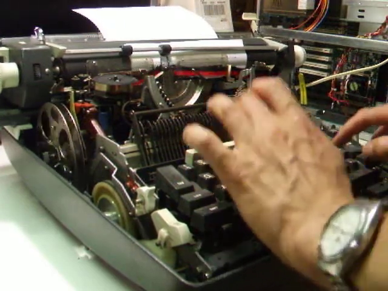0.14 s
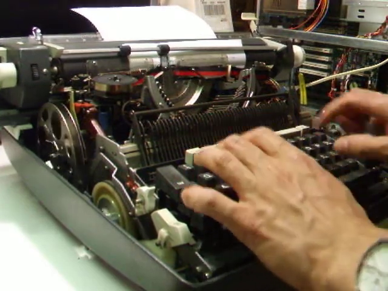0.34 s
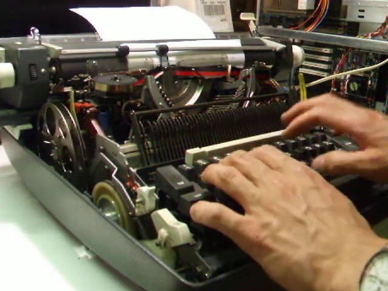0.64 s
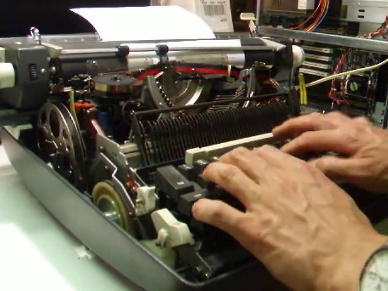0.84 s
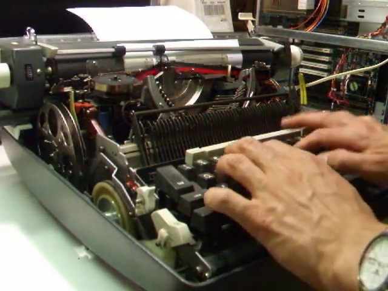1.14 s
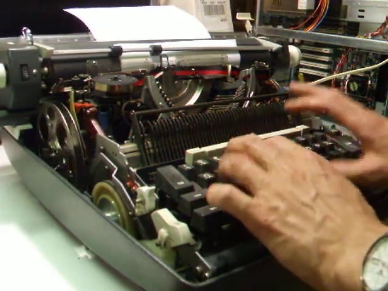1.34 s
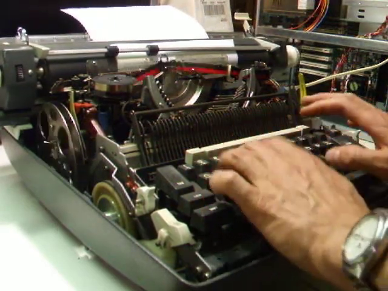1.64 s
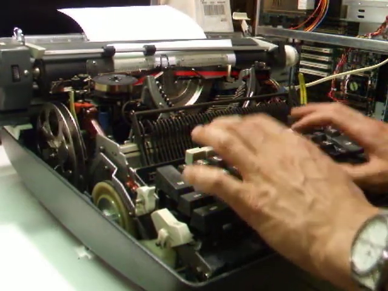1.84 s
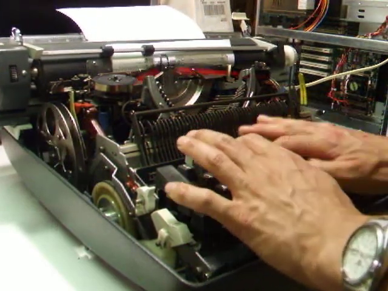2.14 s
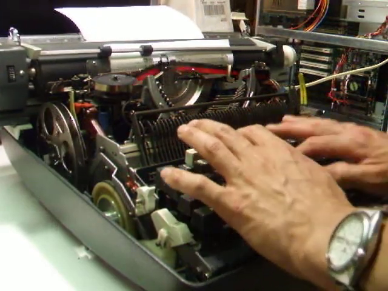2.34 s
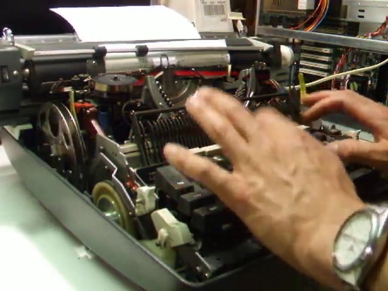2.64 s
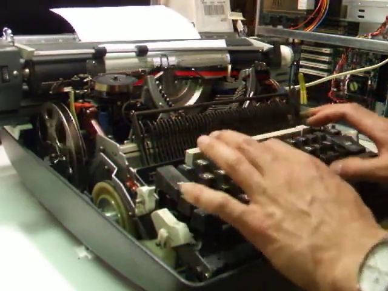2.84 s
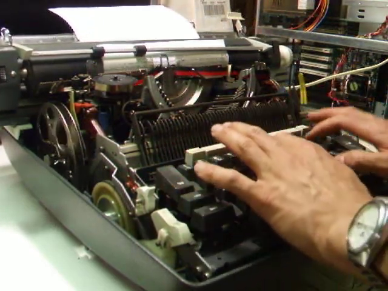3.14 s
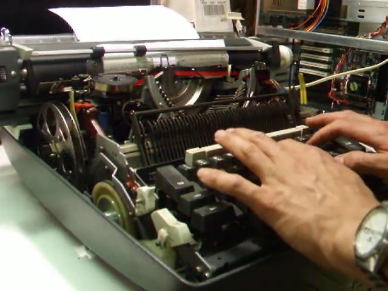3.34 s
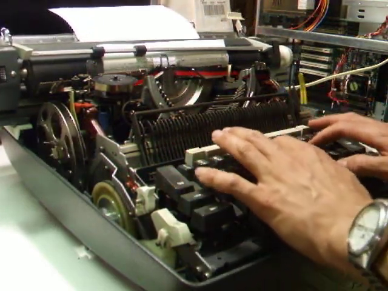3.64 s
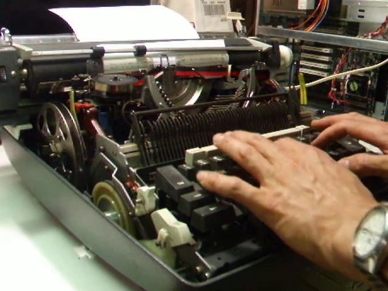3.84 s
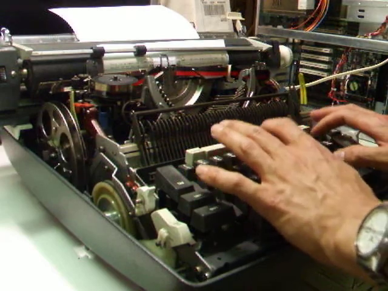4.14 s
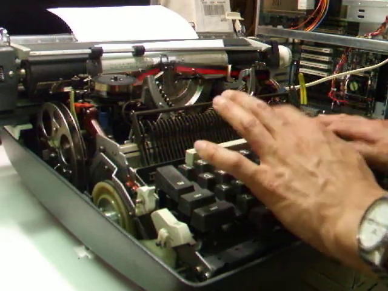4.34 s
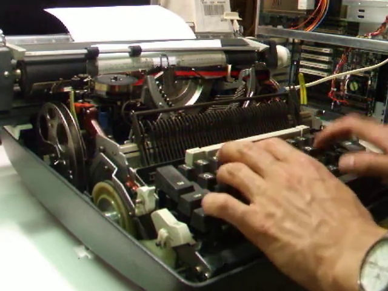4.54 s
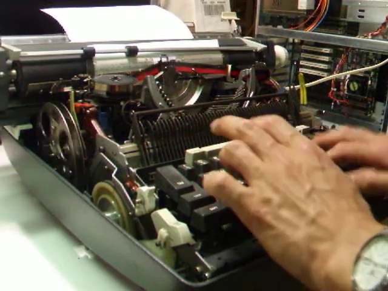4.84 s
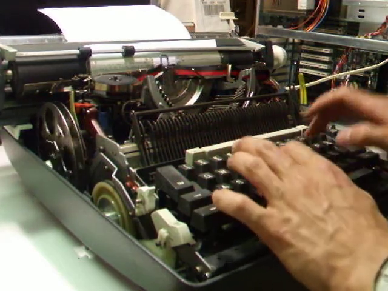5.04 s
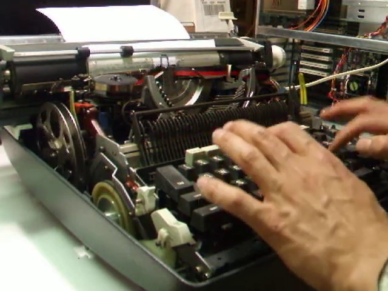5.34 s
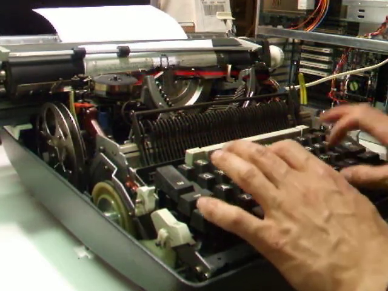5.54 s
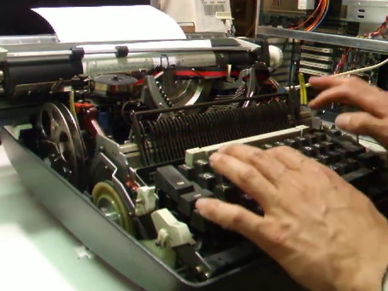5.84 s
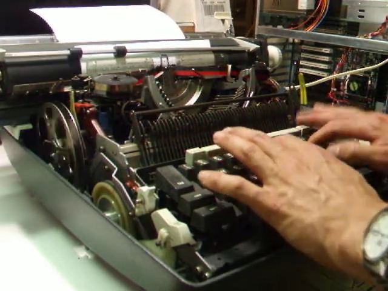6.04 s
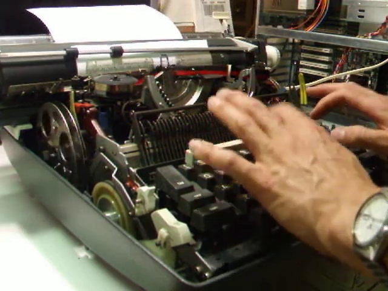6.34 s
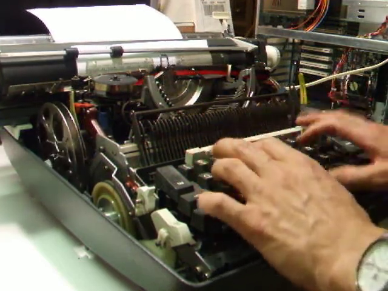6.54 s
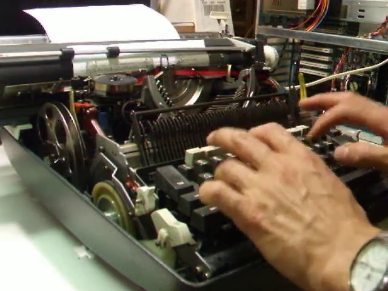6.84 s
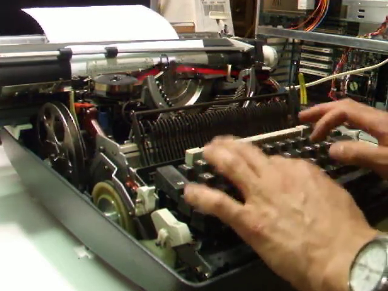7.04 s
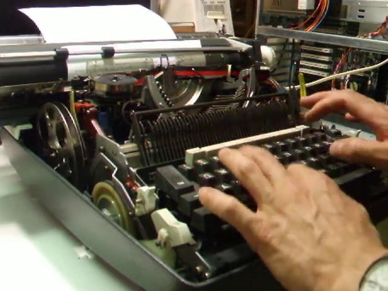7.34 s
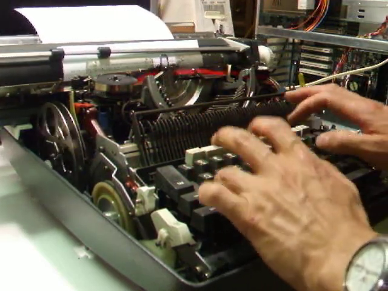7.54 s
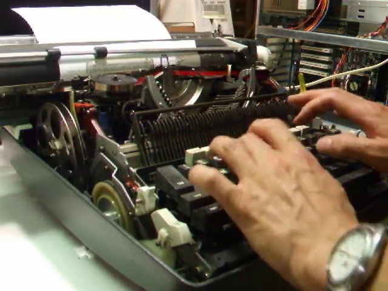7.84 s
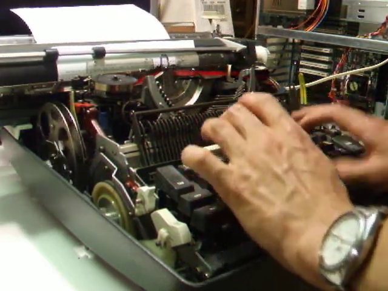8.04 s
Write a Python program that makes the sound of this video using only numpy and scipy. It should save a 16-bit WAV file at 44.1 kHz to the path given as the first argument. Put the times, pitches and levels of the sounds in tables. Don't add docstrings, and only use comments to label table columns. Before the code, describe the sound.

An open electric typewriter, heard very close in a workshop. Fast, irregular keystrokes: each a bright click, a tiny whirr, then a hard, dry slap on the roller and a loose metal rattle. After nearly three seconds the typing pauses for over a second, leaving a low motor hum with a thin whine, then resumes until the end. Short room echo, dull top, the hardest hits slightly distorted.

```python
import sys
import numpy as np
from scipy import signal
from scipy.fft import rfft, irfft, next_fast_len
from scipy.io import wavfile
from scipy.ndimage import uniform_filter1d

SR = 44100
rng = np.random.default_rng(int(sys.argv[2]) if len(sys.argv) > 2 else 0)


def boost_factor(decibels):
    exponent = np.asarray(decibels, float) / 20
    return 10 ** exponent


def put_to_file(sound):
    columns = np.atleast_2d(sound).T
    safe = np.clip(columns, -1, 1)
    whole_steps = np.round(safe * 32767)
    wavfile.write(sys.argv[1], SR, whole_steps.astype(np.int16))


N = 361179

# [start_s, ping_db, ping_hz,
# click_db]
LATCH_TRIPS = [(0.0222, -12.1, 6570, -17.0), (0.2203, -15.7, 6370, -25.7), (0.4268, -27.7, 5820, -33.5),
               (0.8348, -11.1, 5760, -15.6), (0.9852, -10.5, 6500, -18.4), (1.1336, -11.4, 5760, -14.7),
               (1.267, -19.9, 6430, -27.7), (1.4025, -12.2, 6670, -20.4), (1.5796, -20.8, 6360, -26.5),
               (1.7487, -24.4, 5140, -25.5), (1.7804, -25.3, 5370, -33.9), (1.9422, -8.7, 6100, -11.9),
               (2.1451, -13.8, 6200, -17.5), (2.3314, -14.7, 7280, -25.9), (2.4188, -16.2, 6090, -21.8),
               (2.5324, -18.1, 6410, -26.7), (2.8938, -24.0, 6050, -33.5),
               (4.2394, -9.9, 6290, -16.0), (4.318, -16, 5950, -19), (4.3495, -18, 7000, -30),
               (4.5765, -10.0, 6390, -19.8), (4.7175, -15.7, 5920, -22.1), (4.8295, -10.9, 6290, -22.8),
               (4.9792, -13.1, 6420, -15.7), (5.1681, -7.8, 5840, -18.9), (5.4161, -21.2, 6470, -31.2),
               (5.6699, -14.6, 6930, -22.4), (5.9331, -12.1, 6170, -20.1), (6.0637, -11.5, 6520, -20.9),
               (6.2264, -9.5, 6220, -16.7), (6.5598, -21.3, 6210, -29.7), (6.7692, -16.3, 6060, -21.6),
               (6.9213, -11.5, 6320, -18.8), (7.0188, -13.5, 6340, -17.8), (7.174, -24.9, 5520, -28.4),
               (7.3724, -10.3, 5960, -22.8), (7.4852, -18.1, 7090, -20.7), (7.635, -14.9, 6170, -15.9),
               (7.7529, -17.2, 7360, -20.9), (7.905, -16.5, 5790, -23.6), (8.0832, -26.8, 6020, -33.0)]
# [start_s, peak_db, swing_db, rattle_s]
TYPE_STRIKES = [(0.0592, -3.8, -9, .053), (0.2598, -6.2, -10.5, .042), (0.8788, -4.7, -10.5, .045),
                (1.0215, -1.1, -12, .046), (1.1785, -5, -10.5, .053), (1.4429, -4.9, -10, .047),
                (1.6183, -4.7, -11, .027), (1.6678, -4.7, -9.5, .043), (1.9885, -5.9, -10.5, .042),
                (2.1908, -4.7, -8.5, .043), (2.3724, -1.2, -9, .037), (2.4555, -4.7, -9.5, .042),
                (2.5714, -5.2, -12, .042),
                (4.2797, -4.7, -9.5, .038), (4.3859, -4.9, -6, .05), (4.6162, -7.9, -9, .06),
                 (4.7537, -5.5, -8, .065), (4.8728, -9.0, -10, .05), (5.0241, -5.9, -6.5, .047),
                 (5.2122, -4.8, -7.5, .043), (5.4557, -7.0, -7, .076), (5.709, -6.3, -11, .054),
                 (5.974, -4.6, -7.5, .049), (6.1039, -2.5, -8.5, .046), (6.2646, -0.9, -11.5, .049),
                 (6.8067, -0.9, -12, .055), (6.9637, -5, -10, .05), (7.0575, 0.3, -9, .068),
                 (7.4099, -4.1, -8, .041), (7.5239, -0.6, -9, .044), (7.6793, -4.4, -8, .047),
                 (7.7913, -1.6, -11.5, .04), (7.9417, -5.2, -7, .044)]
# [start_s, level_db (rms), length_s]
SPACES = [
    (0.428, -28.5, 0.11),
    (1.271, -28.5, .09),
    (1.798, -30.5, 0.096),
    (2.915, -29, .095),
    (4.435, -28.5, 0.09),
    (5.525, -32.5, 0.067),
    (6.573, -28, 0.11),
    (7.169, -33, 0.1005),
    (8.098, -31.5, .1),
]
# [share of its length, level_db over the space]
SPACE_CAMS = [
    (.04, 15.5),
    (.33, 15),
    (.62, 14.5),
    (.9, 12.5),
]
# [start_s, peak_db, length_s]
SETTLES = [
    (0.168, -26, .012),
    (1.745, -24, 0.0079),
    (2.68, -45, .01),
    (3.035, -25.5, 0.014),
    (3.526, -38, .018),
    (5.62, -23, 0.018),
    (6.705, -29, .016),
    (7.15, -25, 0.022),
    (7.211, -27, 0.008),
    (7.276, -35, 0.017),
]
# [frequency_hz, density_db (per Hz)]
METALWORK = [(200, -10), (340, -19), (800, -7), (1400, -5), (2100, 0.5), (2700, -8.5), (3400, -3),
             (5000, 1.5), (6600, -1), (7600, 2), (9000, 6.5)]
# [frequency_hz, level_db, t60_s]
SLUG_MODES = [(1410, -18, 0.01), (2607, -17.5, 0.0034), (4296, -8.5, 0.011), (5463, -3.5, 0.006),
              (6336, 3, 0.0044), (6880, 6, 0.0046), (7535, 7, 0.0036)]
# [frequency_hz, width_hz, level_db]
CASE_MODES = [(207, 24, 0.5), (303, 55, -0.5), (370, 40, 1), (560, 120, -5.5)]
# [frequency_hz, width_hz, level_db]
DESK_MODES = [(46.8, 14, -10), (116, 54, -4.5)]
# [delay_s from the strike, thud_db, case_db (rms), length_s]
JOLTS = [
    (-.022, -38.5, -41.5, 0.0094),
    (.045, -37.5, -43.5, 0.016),
]
DESK_LAGS = [0.00735, 0.01617]
# [frequency_hz, level_db (rms)]
HUM = [(60, -59), (120, -66), (178.6, -74), (206.6, -62), (240, -66.5), (357.2, -56), (387, -66),
       (413.1, -64), (610.5, -74), (714.2, -71), (774, -73), (833.5, -74)]
# [frequency_hz, level_db (rms)]
WHINE = [(7822, -80), (7854, -73), (7881, -74.5), (7913, -88), (8118, -68), (8150, -83.5), (8177, -92)]
# [frequency_hz, width_hz, level_db (rms)]
BEARINGS = [(980, 90, -68), (3490, 80, -71.5), (4710, 35, -67.5), (5200, 120, -71), (5670, 140, -71)]
# [frequency_hz, density_db (per Hz)]
AIR_SPECTRUM = [(45, -22), (85, -17.5), (180, -17), (330, -16), (560, -20.5), (900, -16), (3000, -21.5),
                (4800, -19.5), (9000, -24)]
# [time_s, motor_db]
MOTOR_GAIN = [(0, -1), (.7, -1), (2.75, -3), (3.2, -1), (3.7, 0), (4.2, 1), (4.4, -1), (8.19, -1)]
# [start_s, peak_db, pitch_hz]
LONE_TICK = (3.9656, -30, 5200)
# [frequency_hz, gain_db]
TOP_CUT = [(7300, 0), (8000, -5), (8500, -16), (8940, -29), (9040, -85)]

TRIPS = LATCH_TRIPS
STRIKES = np.transpose(TYPE_STRIKES)


def rms_one(x):
    return x / np.sqrt(np.mean(x ** 2) + 1e-20)


def at_hz(points, hz):
    table_hz, table_db = np.array(points).T[:2]
    return np.interp(np.log(hz), np.log(table_hz), table_db)


def drift(rate):
    r = np.exp(-40 * np.pi * rate / SR)
    slow = signal.lfilter([1], [1, -2 * r, r * r], rng.standard_normal(N // 20 + 2002))[2000:]
    return np.interp(np.arange(N) / 20, np.arange(len(slow)), rms_one(slow))


def resonate(x, hz, width_hz):
    r = np.exp(-np.pi * width_hz / SR)
    zeros = np.array([1, 0, -1]) * (1 - r * r) / 2
    poles = [1, -2 * r * np.cos(2 * np.pi * hz / SR), r * r]
    return signal.lfilter(zeros, poles, x + 1e-18)


def shaped(x, spectrum):
    size = next_fast_len(N)
    hz = np.arange(1, size // 2 + 2) * SR / size
    return irfft(rfft(x, size) * boost_factor(at_hz(spectrum, hz)), size)[..., :N]


def add(out, s, sound):
    i = round(s * SR)
    out[i:i + len(sound)] += sound[:max(N - i, 0)]


def blow(modes_hz, modes_db, t60, contact_s):
    t = np.arange(2600)[:, None] / SR
    decay = boost_factor(modes_db - 60 * t / t60)
    rings = decay * np.sin(2 * np.pi * modes_hz * t) * (1 - np.exp(-t / contact_s))
    sound = rings.sum(axis=1)
    return sound / np.abs(sound).max()


def motion(s, db, lasts_s, rise_s, fall_db_per_s):
    out = np.zeros(N)
    t = np.arange(9000) / SR
    for start, level, length in zip(s, db, lasts_s):
        shape = boost_factor(level - fall_db_per_s * np.maximum(t - length, 0)) * (1 - np.exp(-t / rise_s))
        add(out, start, shape ** 2)
    return out


def boom(modes, db):
    push, sound = rng.standard_normal(N), np.zeros(N)
    for k, (hz, width_hz, level_db) in enumerate(modes):
        sound += (-1) ** k * boost_factor(level_db) * resonate(push, hz, width_hz)
    return boost_factor(db) * sound / np.sqrt(uniform_filter1d(sound ** 2, size=2200))


def motor():
    t = np.arange(N) / SR
    shaft_hz = 29.77
    wander_s = np.cumsum(1 + .0006 * drift(2)) / SR
    sound = np.zeros(N)
    for hz, db in HUM:
        level = np.sqrt(2) * boost_factor(db + .8 * drift(4))
        sound += level * np.sin(2 * np.pi * (hz * wander_s + rng.random()))
    for hz, db in WHINE:
        sound += np.sqrt(2) * boost_factor(db + 4.5) * np.sin(2 * np.pi * (hz * t + rng.random()))
    throb = boost_factor(6.9 * np.sin(2 * np.pi * shaft_hz * wander_s) + 2.0 * drift(27))
    grit = rng.standard_normal(N) * throb
    for hz, width_hz, db in BEARINGS:
        sound += boost_factor(db) * rms_one(resonate(grit, hz, width_hz))
    sound += boost_factor(-48) * rms_one(shaped(rng.standard_normal(N) * throb ** 0.24, AIR_SPECTRUM))
    gain_s, gain_db = np.transpose(MOTOR_GAIN)
    return sound * boost_factor(np.interp(t, gain_s, gain_db))


def latches():
    out, luck = np.zeros(N), rng.standard_normal((len(TRIPS), 3, 7))
    spread = np.linspace(-1, 1, 7)
    levels = -13 * spread ** 2
    for (s, ping_db, hz, click_db), (shift, strength, again) in zip(TRIPS, luck):
        bright = hz * (1 + .24 * spread + .015 * shift)
        low = 3700 * (1 + .27 * spread + .02 * shift)
        ping = blow(bright, levels + 2 * strength, t60=.011, contact_s=.00015)
        second_ping = blow(bright, levels + 3 * again, t60=.013, contact_s=.0002)
        click = blow(low, 2 * again, t60=.014, contact_s=.0002)
        add(out, s - .0003, boost_factor(ping_db + 3) * ping)
        add(out, s + .0011, boost_factor(ping_db - 3) * second_ping)
        add(out, s - .0003, boost_factor(click_db - 1) * click)
    return out


def linkage_power():
    trip_s, ping_db = np.transpose(TRIPS)[:2]
    s, _, swing_db, rattle_s = STRIKES
    space_s, space_db, space_lasts = np.transpose(SPACES)
    same = np.ones(len(s))
    throws_bar = np.abs(s[:, None] - trip_s - .04).min(axis=0) < .01
    whirr_db = -27.5 + 0.39 * (ping_db + 11)
    power = motion(trip_s, whirr_db, 0.022 * throws_bar, rise_s=0.00067, fall_db_per_s=603.5)
    power += motion(s, -29.5 * same, rattle_s, rise_s=0.012, fall_db_per_s=325.0)
    power += motion(space_s, space_db - 5, space_lasts, rise_s=0.01, fall_db_per_s=350.5)
    swing = (s - 0.022, swing_db, 0.018 * same)
    landing = (s + 0.037, -16 * same, 0.0086 * same)
    bursts = [swing, landing, np.transpose(SETTLES)]
    for share, db in SPACE_CAMS:
        bursts.append((space_s + share * space_lasts, space_db + db, 0.13 * space_lasts))
    for start, db, lasts_s in bursts:
        power += motion(start, db - 12, lasts_s, rise_s=0.0081, fall_db_per_s=803.5)
    dip = np.zeros(N)
    for start in s:
        add(dip, start - .003, np.hanning(265))
    return power * boost_factor(-24 * dip)


def linkage(power):
    sizes = boost_factor(2.7 * np.minimum(rng.exponential(1, N), 4)) * rng.choice([-1, 1], N)
    contacts_per_s = 16000 * boost_factor(2.2 * drift(110))
    contacts = rms_one(sizes * (rng.random(N) < contacts_per_s / SR))
    dealt, out, total = rng.integers(0, 26, N), np.zeros(N), 0
    for k, hz in enumerate(np.geomspace(300, 8600, 26)):
        level = boost_factor(at_hz(METALWORK, hz) + 2.0 * drift(36))
        ring = level * resonate(contacts * (dealt == k), hz, 0.19 * hz)
        inertia = np.exp(-(hz / 1000) ** 1.28 / (0.012 * SR))
        out += ring * np.sqrt(signal.lfilter([1 - inertia], [1, -inertia], power + 1e-18))
        total += np.mean(ring ** 2)
    return out / np.sqrt(total)


def ticks(power):
    out, luck = np.zeros(N), rng.random((1500, 6))
    times = np.cumsum(-np.log(1 - luck[:, 0])) / 140
    for s, (_, size, pitch, *shift) in zip(times[times < N / SR - .01], luck):
        modes = 2400 * 3.0 ** pitch * (0.88 + 0.37 * np.array(shift))
        level = np.sqrt(power[int(s * SR)]) * boost_factor(6 - 16 * size)
        add(out, s, level * blow(modes, 0, t60=0.03, contact_s=0.00011))
    rest_db = np.array([0., -6, -4])
    for s, (late, db, *shift) in zip(STRIKES[0], rng.standard_normal((len(STRIKES[0]), 5))):
        modes = 4220 * np.array([1, 1.25, 1.7]) * (1 + 0.026 * np.array(shift))
        ping = blow(modes, rest_db, t60=0.017, contact_s=.0003)
        add(out, s + .043 + .002 * late, boost_factor(-23 + 1.4 * db) * ping)
    s, db, hz = LONE_TICK
    modes = hz * np.array([.8, .9, 1, 1.15, 1.3, 1.45])
    add(out, s, boost_factor(db) * blow(modes, 0, t60=.02, contact_s=.0002))
    return out


def frame():
    s, (space_s, _, space_lasts) = STRIKES[0], np.transpose(SPACES)
    letters = len(s)
    luck, thuds = rng.standard_normal((letters + len(space_s), 3)), np.zeros(N)
    case = motion(space_s + 0.0089, -47 + 0 * space_s, space_lasts, rise_s=0.0084, fall_db_per_s=257)
    desk_s, desk_db = np.append(s - .02, space_s + 0.026), -49 + 2.1 * luck[:, 2]
    desk = motion(desk_s, desk_db, 0.11 + 0 * desk_s, rise_s=0.005, fall_db_per_s=120.5)
    knocks = list(zip(space_s + 0.091, -41.5 + 1.9 * luck[letters:, 0]))
    for k, (after_s, thud_db, case_db, lasts_s) in enumerate(JOLTS):
        chance = luck[:letters, k]
        case += motion(s + after_s, case_db + 1.9 * chance, lasts_s + 0 * s, rise_s=0.0041, fall_db_per_s=306)
        knocks += zip(s + after_s + DESK_LAGS[k], thud_db + 1.3 * chance)
    thud_hz, modes_db = np.array([85., 118, 205]), np.array([-4., 0, -5])
    for start, db in knocks:
        add(thuds, start, boost_factor(db) * blow(thud_hz, modes_db, t60=0.07, contact_s=0.0037))
    desk_boom = boom(DESK_MODES, 10 * np.log10(desk + 1e-9))
    return thuds + desk_boom + boom(CASE_MODES, 10 * np.log10(case + 1e-9))


def type_slaps():
    times, peaks_db = STRIKES[:2]
    out, luck = np.zeros(N), rng.standard_normal((len(times), 3, len(SLUG_MODES)))
    off_middle = np.arange(len(times)) - 17.5
    knocks_db = -17 - 11.5 * np.exp(-(off_middle / 7.0) ** 2) + 0.3 * (peaks_db + 3.5)
    clanks_db = -14.7 - .015 * np.abs(off_middle) ** 2.5
    knock_hz, clank_hz = 2100 * np.array([.95, 1.05]), 3450 * np.array([.98, 1.02])
    hz, level_db, t60 = np.transpose(SLUG_MODES)
    for s, db, knock_db, clank_db, (shift, strength, bounce) in zip(times, peaks_db, knocks_db, clanks_db, luck):
        modes = hz * (1 + .015 * shift)
        crack = -blow(modes, level_db + 2.2 * strength, t60, contact_s=.0002)
        knock = boost_factor(knock_db - 0.14) * blow(knock_hz, 0, .024, contact_s=0.000092)
        clank = boost_factor(clank_db + 0.6) * blow(clank_hz, 0, .018, contact_s=0.00016)
        top = np.abs(crack).argmax()
        crack *= boost_factor(db + 1.1) - np.sign(crack[top]) * (knock[top] + clank[top])
        add(out, s - top / SR, crack + knock + clank)
        slap_back = blow(modes, level_db + 3 * bounce, t60, contact_s=.0003)
        add(out, s + .0013, boost_factor(db - 9) * slap_back)
        rebound = blow(modes, 2 * level_db, 1.6 * t60, contact_s=.0005)
        add(out, s + .0066 + .0003 * bounce[0], boost_factor(db - 13 + 1.5 * bounce[1]) * rebound)
    return out


def workshop(x):
    t = np.arange(SR // 2) / SR
    t60_s, level_db = 0.24, -13.5
    tail = rng.standard_normal(len(t)) * boost_factor(-60 * t / t60_s) * (t > .004)
    return boost_factor(level_db) * signal.fftconvolve(x, tail / np.sqrt(np.sum(tail ** 2)))[:N]


def scene():
    power = linkage_power()
    typing = latches() + linkage(power) + ticks(power) + type_slaps()
    return (motor() + typing + frame() + workshop(typing))[None]


def low_pass(x):
    return signal.sosfilt(signal.butter(12, 15870, fs=SR, output="sos"), x)


def record(dry):
    offset, overload = -.0024, .70
    clipped = np.clip(shaped(dry, TOP_CUT) + offset, -overload, overload)
    return low_pass(clipped)


dry = scene()
out = record(dry)
put_to_file(out)
```